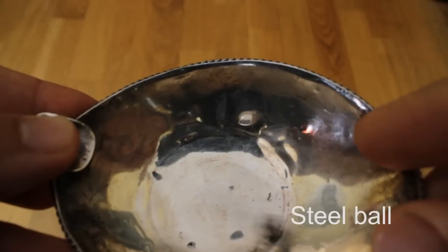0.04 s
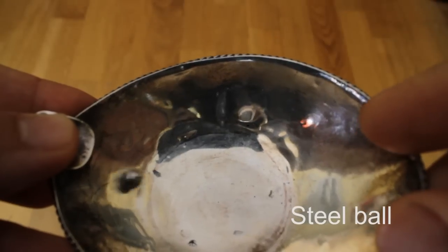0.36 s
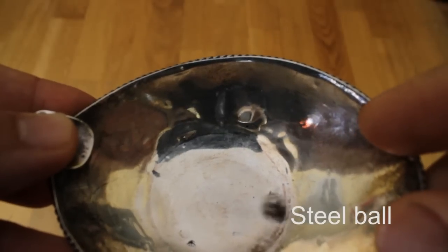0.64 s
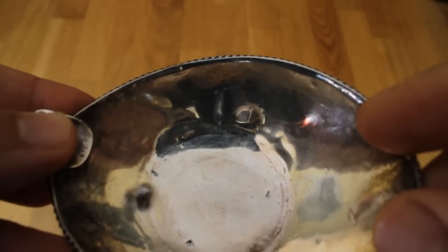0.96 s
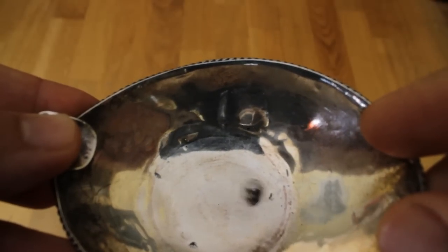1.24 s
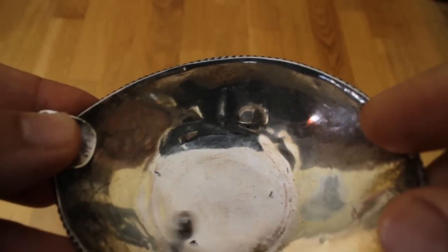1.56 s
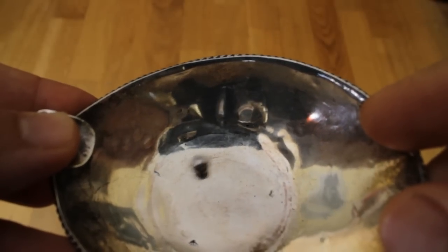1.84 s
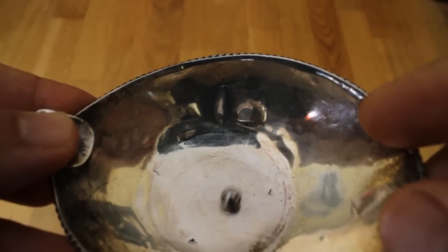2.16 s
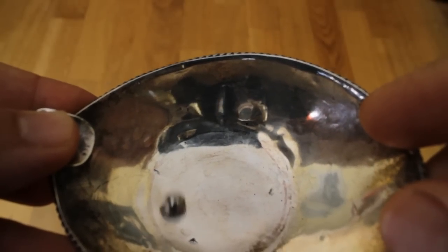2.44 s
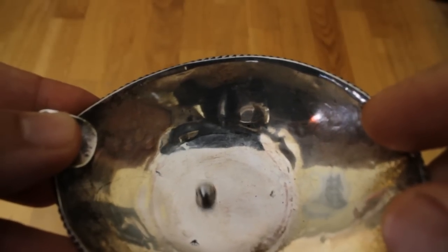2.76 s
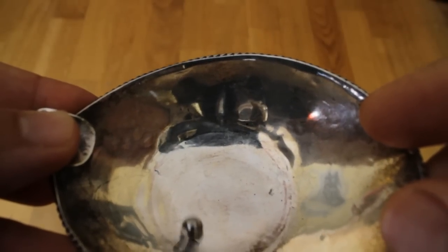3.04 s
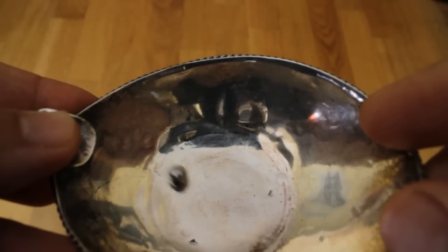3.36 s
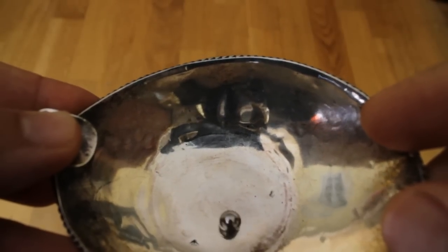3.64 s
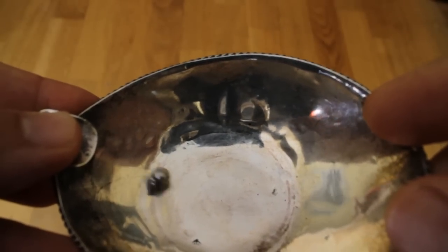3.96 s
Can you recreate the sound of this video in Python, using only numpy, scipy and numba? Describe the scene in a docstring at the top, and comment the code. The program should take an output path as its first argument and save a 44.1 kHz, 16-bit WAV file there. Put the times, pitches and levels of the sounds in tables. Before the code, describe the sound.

A small steel ball clinks and rolls in a hand-held metal dish, close by. It bounces brightly in the first 0.1 seconds, then swings to and fro about three times a second, each pass rasping and ringing with scattered clinks. From about 1.5 seconds the rolling softens, continuing to 4 seconds, with a sharper clink near 3.2. A faint low rumble and quiet room noise lie behind.

```python
"""Bright clinks: a small steel ball bounces, then swings to and fro in a hand-held metal dish, close by.
Each pass rasps and chatters across the floor of the dish and pulls its modes out of tune; on the
sloping wall the ball growls lower. It hops and clinks over dents, and the dish rings briefly.
Behind it: the low rumble of the held dish, a quiet room and, for a while, a faint hum."""
import sys
import numpy as np
from scipy import signal
from scipy.fft import rfft, irfft
from scipy.io import wavfile
from scipy.ndimage import uniform_filter1d, map_coordinates
from numba import njit

SR = 44100
rng = np.random.default_rng(int(sys.argv[2]) if len(sys.argv) > 2 else 0)


def waveform_to_disk(signal):
    """Save audio, clipped to [-1, 1], as 16-bit WAV at the path in sys.argv[1]."""
    frames = np.transpose(np.atleast_2d(signal))
    scaled = np.clip(frames, -1, 1) * 32767
    samples = np.round(scaled).astype(np.int16)
    wavfile.write(sys.argv[1], SR, samples)


N = 176400

# Passes of the ball. Each row: start, fastest moment and end in seconds; rasp, fizz, mode drive,
# growl and murmur at the opening turn in dB; load on the floor of the dish from 0 to 1.
BALL_PASSES = [(0.121, 0.243, 0.43, -28, -27, -26.5, -41.5, -34.5, 0.66),
               (0.414, .575, 0.73, -24.5, -26, -26, -40, -48.5, 0.95),
               (0.716, 0.863, 1.064, -25.5, -27, -26.5, -40, -53, 0.7),
               (1.014, 1.187, 1.377, -26, -24.5, -25, -45, -46, 0.59),
               (1.342, 1.487, 1.743, -33.5, -33.5, -29.5, -44, -79, 0.62),
               (1.707, 1.82, 2.023, -39.5, -32.5, -30.5, -43, -41, 0.75),
               (1.991, 2.195, 2.42, -33, -43, -38.5, -45.5, -44, 1),
               (2.362, 2.454, 2.627, -36.5, -36, -31, -45, -42, 0.27),
               (2.582, 2.777, 2.947, -31.5, -35.5, -34, -47, -58, 1),
               (2.995, 3.141, 3.34, -37.5, -40, -33.5, -55, -41.5, 0.29),
               (3.271, 3.458, 3.61, -35, -41.5, -39.5, -55, -46, 1),
               (3.712, 3.864, 4.12, -37.5, -41.5, -38, -71, -62, 0.78)]
# Hops and bounces. Each row: time in seconds; strength for treble, lowest mode and rim modes in dB.
LANDINGS = [(0.0004, -4.5, -8, -18), (0.0228, -4, -9.5, -18), (0.0493, -6.5, -17, -14),
            (0.0595, -4, -17, -16), (0.0695, -15, -23, -27), (0.0774, -25, -25, -43),
            (0.0874, -14, -21, -49), (0.0964, -15, -40, -47), (0.1054, -18, -30, -44),
            (0.1164, -16, -45, -42), (0.1224, -19, -30, -37), (0.1295, -17.5, -27.5, -40),
            (0.1845, -16, -30, -29), (0.2214, -18.5, -25, -44), (0.2359, -4, -50, -32),
            (0.2784, -14, -47, -33), (0.3032, -23, -17, -42), (0.3184, -10, -24, -47),
            (0.3371, -10.5, -36, -34), (0.4609, -22.5, -26, -55), (0.4788, -28, -48, -55),
            (0.5018, -7.5, -13.5, -18.5), (0.5254, -10.5, -13.5, -49), (0.5581, -6, -44, -13.5),
            (0.5754, -11, -23, -37), (0.59, -11, -38, -40), (0.6144, -13, -39, -41),
            (0.6344, -18, -18, -20), (0.6484, -16.5, -35, -26), (0.749, -31, -49, -45),
            (0.7721, -19, -31, -26), (0.7866, -14.5, -15.5, -21), (0.8255, -8, -19, -45),
            (0.8314, -17, -40, -43), (0.8634, -31, -36, -34), (0.8954, -11, -16, -22),
            (0.9084, -7, -11.5, -36), (0.9184, -5, -14.5, -15.5), (0.9672, -10.5, -13, -40),
            (0.9971, -17.5, -32, -62), (1.052, -18.5, -18, -32), (1.0789, -15, -20, -38),
            (1.0949, -14, -24, -42), (1.1134, -14, -15, -42), (1.1323, -9, -38, -16.5),
            (1.1744, -26, -29, -18.5), (1.1887, -8, -39, -34), (1.2004, -17, -43, -36),
            (1.2374, -14, -32, -46), (1.2474, -25, -17, -29), (1.4032, -26, -43, -26),
            (1.4292, -26, -19, -39), (1.4654, -28, -28, -30), (1.4765, -10.5, -41, -40),
            (1.5304, -10.5, -42, -23), (1.5748, -12.5, -18, -28.5), (1.595, -13, -32, -38),
            (1.7564, -17.5, -29, -55), (1.8004, -12, -23, -21), (1.8188, -11.5, -14.5, -27),
            (1.9265, -20.5, -29, -28), (2.0867, -17.5, -18, -28), (2.1004, -51, -33, -35),
            (2.1266, -14, -23, -45), (2.1714, -12, -23, -22.5), (2.2062, -16.5, -24, -36),
            (2.2578, -18, -26, -49), (2.3231, -13, -26, -33.5), (2.4463, -9.5, -35, -17.5),
            (2.4753, -15, -23, -34), (2.4912, -8, -37, -14), (2.6309, -24, -23, -52),
            (2.7377, -15, -34, -42), (2.757, -12, -16.5, -24), (2.7846, -11.5, -37, -31),
            (2.8185, -21.5, -42, -50), (2.8754, -24.5, -52, -51), (3.0275, -11, -17, -23),
            (3.1774, -11, -13, -29), (3.1857, -3.5, -14.5, -11.5), (3.3595, -24.5, -29, -38),
            (3.3842, -23, -17.5, -52), (3.4261, -24, -28, -43), (3.4654, -22, -13.5, -30),
            (3.472, -10.5, -46, -33), (3.5279, -27, -30, -63), (3.5643, -25.5, -28.5, -37),
            (3.8417, -28, -26, -52), (3.8806, -15, -14.5, -42), (3.9759, -26, -25, -61)]
# Dish modes. Each row: free pitch in Hz, free T60 in seconds, struck gain in dB, rolled gain in dB,
# scale of the pitch pull under the ball in percent.
DISH_LOW_MODES = [(2220.6, 0.11, -5.5, -2, 6.5)]
DISH_RIM_MODES = [(2764, 0.14, -15.5, -14.5, 1.8), (3682, 0.19, -5, -9.5, 2.55),
                  (4150, 0.2, -21.5, -32, 1.2), (4485, 0.16, -14, -16, 0.91)]
DISH_HIGH_MODES = [(5614, 0.068, -17.5, -11, 0.68), (6390, 0.12, -24.5, -23, 1.8),
                   (6478, 0.12, -19, -13.5, 2.9), (7482, 0.039, -9, -6, 0.94),
                   (7960, 0.032, -60, -21.5, 2.2), (9300, 0.13, -30.5, -23, .7),
                   (10780, .05, -24, -16, 0.58), (11060, 0.017, -11, -39.5, 3)]
# Longer echo paths round the dish. Each row: mean lag in seconds, lag swing in seconds, linear gain.
FAR_RIM_PATHS = [(.0021, 0.000491, 0.29), (.0037, .0004, 0.16)]
# Noise spectra. Each row: frequency in Hz, relative density in dB.
RASP_SPECTRUM = [(100, -21), (700, -10), (1600, -37.5), (1900, -3.5), (2300, 13), (2650, 2), (3100, 4.5),
                 (4000, 4), (4900, 3), (6000, 3), (8000, -14), (16000, -34)]  # contact on the floor
FIZZ_SPECTRUM = [(100, -50), (2000, -24), (4500, -21.5), (6000, 0), (7200, 9.5), (8900, -2.5), (10800, 4),
                 (13000, -4), (16000, -17)]  # treble of the contact
GROWL_SPECTRUM = [(60, -10), (200, -8), (600, -7.5), (1050, 5.5), (1300, -1), (1600, 8), (2000, 6),
                  (2500, -5), (5000, -8), (15000, -12.5)]  # contact on the wall
MURMUR_SPECTRUM = [(100, -39), (600, -21), (1150, -20), (1500, 5), (1900, 0), (2200, 19), (2500, -20),
                   (5000, -32), (15000, -29)]  # narrow band that lasts through the turns
SPLASH_SPECTRUM = [(100, -26), (500, -31.5), (1200, -5.5), (2000, 2.5), (3000, 2.5), (5000, -12.5),
                   (7200, 6), (8800, 1), (11000, 1), (13500, 1.5), (16000, -18)]  # dense upper modes
TICK_SPECTRUM = [(30, -45), (100, -29), (250, -17), (600, -6), (1050, 2), (1700, 1), (2500, -1), (3800, -7),
                 (5000, -12), (15000, -22)]  # landing
RUMBLE_SPECTRUM = [(25, -21), (60, -7), (150, -3), (300, -4.5), (700, 2.5), (1400, 6.5), (2500, -26),
                   (8000, -30)]  # held dish
ROOM_SPECTRUM = [(20, -39), (45, -6), (100, -1.5), (180, 1), (400, -1), (1000, -7.5), (2000, -11.5),
                 (5000, -12), (16000, -24)]

RASP_EXPONENT, FIZZ_EXPONENT, DRIVE_EXPONENT = 4.27, 3.77, 2.18
GROWL_SPEED, GROWL_SPREAD, GROWL_DB, MURMUR_DB = 0.59, 0.2, 5, -2.5
CHATTER_PER_S, CHATTER_SPREAD_DB, SMOOTH_SHARE = 330, 4, 0.077
CHATTER_RISE_S, CHATTER_DECAY_S = 0.001, 0.0039
CONTACT_SLOW_HZ, CONTACT_RISE_HZ, CONTACT_T60_S, CONTACT_DB = 1530, 863, 0.036, -7.5
FLIGHT_S, FLIGHT_DB = 0.0068, -3.5
NODE_SPREAD_DB, NODE_PER_S = 2.5, 40
PULL_MEAN, PULL_WANDER, PULL_PER_S = 0.38, 0.78, 45
ROLL_DAMPING, BLOW_DAMPING, BLOW_PULL, BLOW_SCATTER_DB = 2.1, 0.4, 0.65, 3
RIM_LAG_S, RIM_SWING_S, RIM_GAIN = 0.0012, 0.000509, 0.29
SPLASH_DB, SPLASH_RISE_S, SPLASH_T60_S = -11.5, 0.0018, 0.038
TICK_DB, SLOW_TICK_DB, TICK_T60_S = -41, -9, 0.01
RADIATION_HZ, TOP_HZ = 880, 16000
RUMBLE_DB, ROOM_DB = -54.5, -54
HUM_DB, HUM_HZ, HUM_START_S, HUM_END_S = -62.5, 197, 1.88, 3.25


def rolling(speed, rasp, fizz, drive, growl, murmur, load):
    """The rough contact rasps and drives the modes; the ball detunes, damps and crosses their nodes."""
    force = chatter() * flight_dips()
    out = noise(RASP_SPECTRUM, force * rasp) + noise(FIZZ_SPECTRUM, force * fizz)
    out += noise(GROWL_SPECTRUM, force * undb(GROWL_DB) * growl)
    out += noise(MURMUR_SPECTRUM, force * undb(MURMUR_DB) * murmur)
    out = rim_echo(out)
    # The ball sings on its springy contact, higher with speed.
    contact_hz = CONTACT_SLOW_HZ + CONTACT_RISE_HZ * speed
    out += rub(force * undb(CONTACT_DB) * np.hypot(rasp, growl), contact_hz, np.full(N, CONTACT_T60_S))
    for hz, t60_s, _, rolled_db, pull_pct in DISH_LOW_MODES + DISH_RIM_MODES + DISH_HIGH_MODES:
        pitch_hz = hz * (1 + pull_pct / 100 * load * (PULL_MEAN + PULL_WANDER * wander(PULL_PER_S)))
        coupling = undb(rolled_db + NODE_SPREAD_DB * wander(NODE_PER_S))
        out += rub(drive * force * coupling, pitch_hz, t60_s / (1 + ROLL_DAMPING * load))
    return out


def ball_motion():
    """Speed (0 to 1) rises and falls in each pass, setting the contact levels and the load on the dish."""
    t = np.arange(N) / SR
    speed, rasp, fizz, drive, growl, load = np.zeros((6, N))
    for start_s, fastest_s, end_s, rasp_db, fizz_db, drive_db, growl_db, _, weight in BALL_PASSES:
        pass_speed = np.sin(np.pi / 2 * np.interp(t, [start_s, fastest_s, end_s], [0, 1, 0]))
        rasp += undb(rasp_db) * pass_speed ** RASP_EXPONENT
        fizz += undb(fizz_db) * pass_speed ** FIZZ_EXPONENT
        drive += undb(drive_db) * pass_speed ** DRIVE_EXPONENT
        on_wall = np.exp(-.5 * ((pass_speed - GROWL_SPEED) / GROWL_SPREAD) ** 2)
        growl += undb(growl_db) * np.minimum(10 * pass_speed, 1) * on_wall
        load += weight * pass_speed ** 4
        speed = np.maximum(speed, pass_speed)
    starts_s, *_, murmur_db, _ = np.array(BALL_PASSES).T
    murmur = undb(np.interp(t, starts_s, murmur_db))
    return speed, rasp, fizz, drive, growl, murmur, load


def chatter():
    """Contact force: tiny uneven hops over a smooth roll."""
    hops = (rng.random(N) < CHATTER_PER_S / SR) * undb(CHATTER_SPREAD_DB * rng.standard_normal(N))
    power = swell(fade(hops, CHATTER_DECAY_S), CHATTER_RISE_S) ** 2
    return np.sqrt(SMOOTH_SHARE + (1 - SMOOTH_SHARE) * power / power.mean())


def flight_dips():
    """The contact weakens during the short flight before each landing."""
    t = np.arange(N) / SR
    flying = np.zeros(N)
    for landing_s, *_ in LANDINGS:
        flying[(t > landing_s - FLIGHT_S) & (t < landing_s)] = 1
    return undb(FLIGHT_DB * uniform_filter1d(flying, size=64))


def clinks(speed, load):
    """Each landing gives a splash of dense upper modes, a dull tick and the ring of the dish."""
    times_s, treble_db, low_db, rim_db = np.array(LANDINGS).T

    def blows(db):
        pulses = np.zeros(N)
        pulses[(times_s * SR).astype(int)] = undb(db)
        return pulses

    splash = fade(blows(treble_db + SPLASH_DB), SPLASH_T60_S / np.log(1000))
    splash = swell(splash, SPLASH_RISE_S)  # vibration takes a moment to spread
    out = rim_echo(noise(SPLASH_SPECTRUM, splash))
    ticks = blows(treble_db / 2 + TICK_DB) * undb(SLOW_TICK_DB * (2 - speed))
    out += noise(TICK_SPECTRUM, fade(ticks, TICK_T60_S / np.log(1000)))
    groups = (DISH_LOW_MODES, low_db), (DISH_RIM_MODES, rim_db), (DISH_HIGH_MODES, treble_db)
    for modes, strength_db in groups:
        for hz, t60_s, struck_db, _, pull_pct in modes:
            pitch_hz = hz * (1 + BLOW_PULL * pull_pct / 100 * load * (PULL_MEAN + wander(PULL_PER_S)))
            push = blows(strength_db + struck_db + BLOW_SCATTER_DB * rng.standard_normal(len(times_s)))
            out += ring(push, pitch_hz, t60_s / (1 + BLOW_DAMPING * load))
    return out


def rim_echo(x):
    """Bending waves return from the rim sooner or later as the ball swings, so resonances sweep."""
    turns_s = np.append(np.array(BALL_PASSES)[:, 0], BALL_PASSES[-1][2])
    swings = np.interp(np.arange(N) / SR, turns_s, np.arange(len(turns_s)))
    for k, (lag_s, swing_s, gain) in enumerate([(RIM_LAG_S, RIM_SWING_S, RIM_GAIN)] + FAR_RIM_PATHS):
        delay_s = lag_s + swing_s * np.cos(np.pi * (swings + k / 2))
        echo = map_coordinates(x, [np.arange(N) - delay_s * SR])
        x = (x + gain * echo) / np.hypot(1, gain)
    return x


def rub(envelope, hz, t60_s):
    """A resonance kept going by a rough contact, at the level of the envelope."""
    return ring(envelope * rng.standard_normal(N) * 2 * np.sqrt(np.log(1000) / (t60_s * SR)), hz, t60_s)


@njit
def ring(x, hz, t60_s):
    """One mode with moving pitch and decay."""
    y, z = np.empty(len(x)), 0j
    for i in range(len(x)):
        z = z * np.exp(complex(-np.log(1000.) / t60_s[i], 2 * np.pi * hz[i]) / SR) + x[i] + 1e-18
        y[i] = z.imag
    return y


def noise(spectrum, envelope=1):
    """Enveloped noise through a minimum-phase filter of unit power gain."""
    hz, db = np.array(spectrum, float).T
    grid_hz = np.maximum(np.arange(4097) * SR / 8192, 1)
    cepstrum = irfft(np.log(undb(np.interp(np.log(grid_hz), np.log(hz), db))))
    cepstrum[1:] *= 2 * (np.arange(1, len(cepstrum)) < len(grid_hz))
    response = irfft(np.exp(rfft(cepstrum)))
    response /= np.sqrt(np.sum(response ** 2))
    return signal.fftconvolve(envelope * rng.standard_normal(N), response)[:N]


def fade(pulses, tau_s):
    """Envelope of pulses whose energies add and decay."""
    return np.sqrt(signal.lfilter([1], [1, -np.exp(-2 / (tau_s * SR))], pulses ** 2 + 1e-18))


def swell(envelope, tau_s):
    """Round the attacks of an envelope."""
    pole = np.exp(-1 / (tau_s * SR))
    return signal.lfilter([1 - pole], [1, -pole], envelope)


def wander(points_per_s):
    """Random curve of unit spread."""
    y = np.interp(np.arange(N) / SR * points_per_s, np.arange(N // 50), rng.standard_normal(N // 50))
    return y / y.std()


def undb(db):
    """Decibels to gain."""
    return 10 ** (np.asarray(db) / 20)


def rumble(speed):
    """The held dish rumbles, louder as the ball speeds up."""
    return undb(RUMBLE_DB) * noise(RUMBLE_SPECTRUM, 0.24 + 1.2 * speed)


def room():
    """Steady room noise and one spell of faint, wavering hum."""
    t = np.arange(N) / SR
    air = undb(ROOM_DB) * noise(ROOM_SPECTRUM)
    gate = uniform_filter1d(1. * ((t > HUM_START_S) & (t < HUM_END_S)), size=6000)
    hum_rms = undb(HUM_DB + 2 * wander(points_per_s=2.54)) * gate
    return air + hum_rms * np.sqrt(2) * np.sin(2 * np.pi * HUM_HZ * t)


def scene():
    """Mono mix: rolling and clinks over rumble and room."""
    speed, rasp, fizz, drive, growl, murmur, load = ball_motion()
    dish = rolling(speed, rasp, fizz, drive, growl, murmur, load) + clinks(speed, load)
    # A small dish radiates little bass.
    dish = signal.sosfilt(signal.butter(1, RADIATION_HZ, "high", fs=SR, output="sos"), dish)
    return (dish + rumble(speed) + room())[None]


def record(dry):
    """A steep low-pass cuts the top."""
    return signal.sosfilt(signal.ellip(10, .2, 80, TOP_HZ, fs=SR, output="sos"), dry)


dry = scene()
out = record(dry)
waveform_to_disk(out)
```